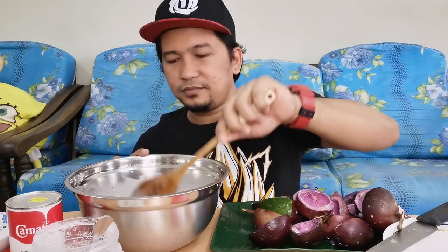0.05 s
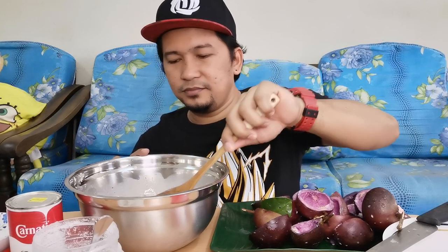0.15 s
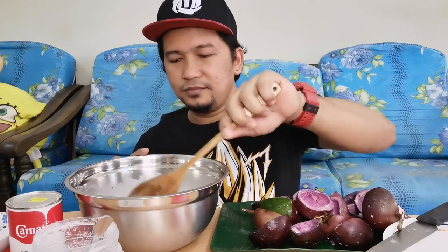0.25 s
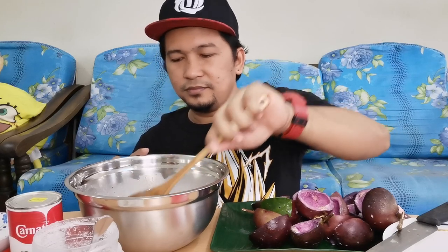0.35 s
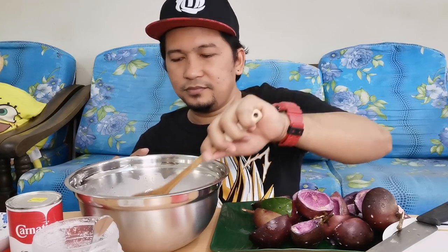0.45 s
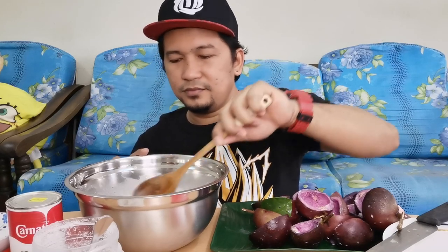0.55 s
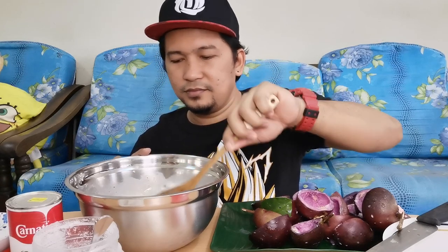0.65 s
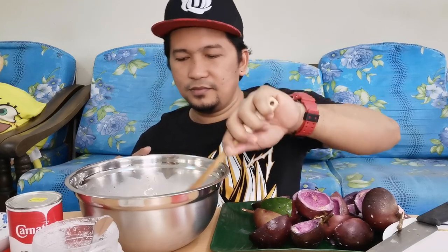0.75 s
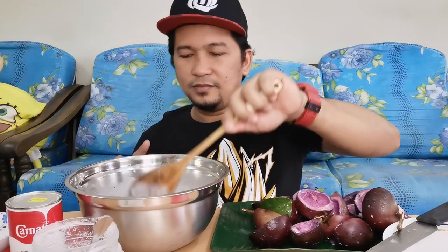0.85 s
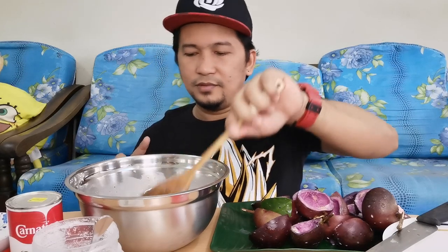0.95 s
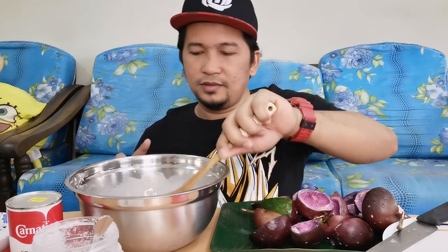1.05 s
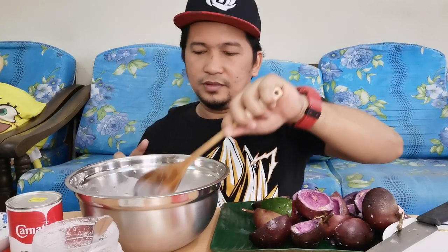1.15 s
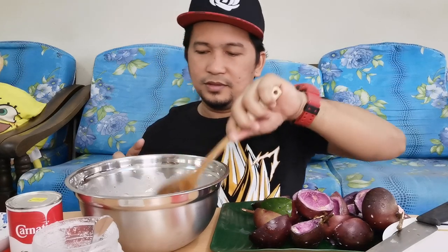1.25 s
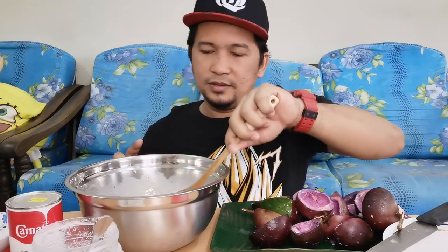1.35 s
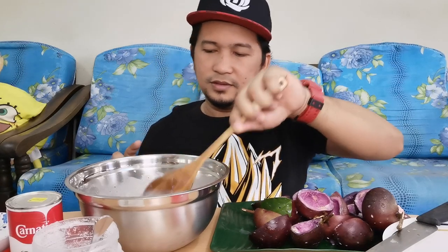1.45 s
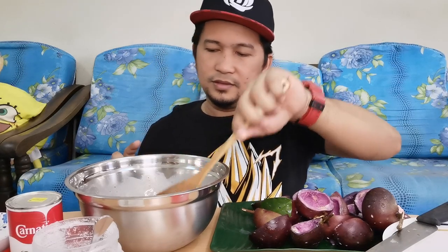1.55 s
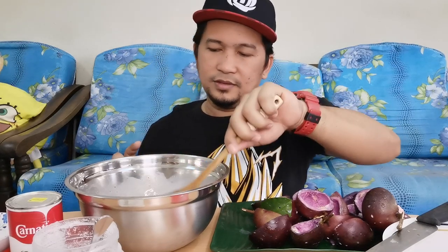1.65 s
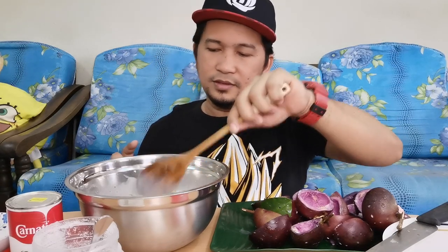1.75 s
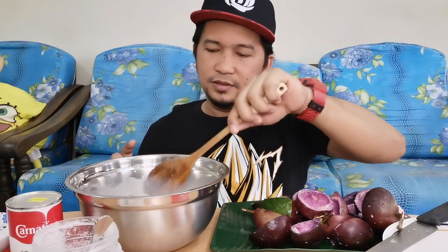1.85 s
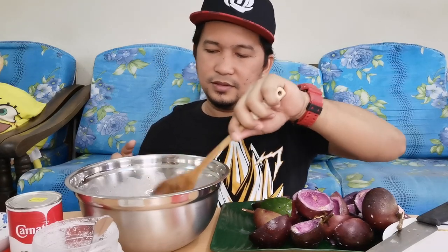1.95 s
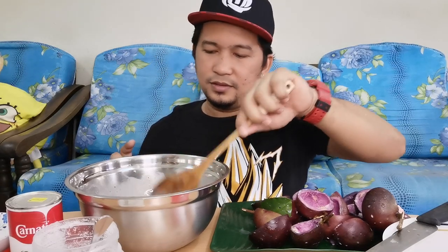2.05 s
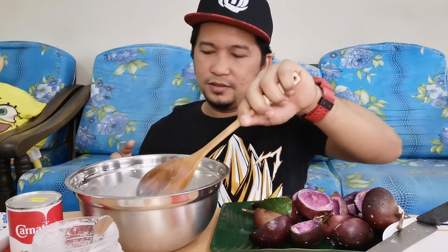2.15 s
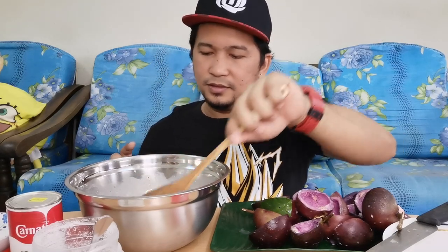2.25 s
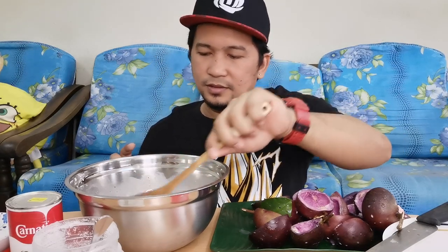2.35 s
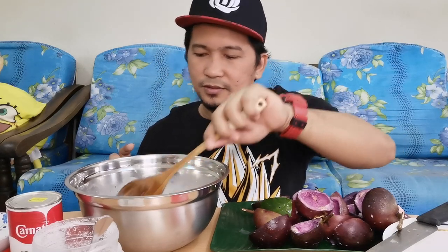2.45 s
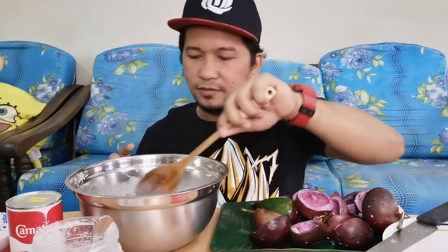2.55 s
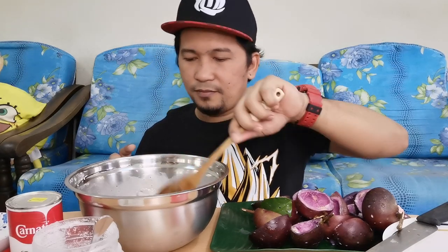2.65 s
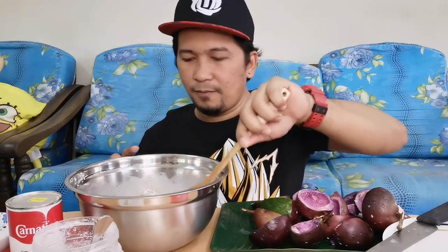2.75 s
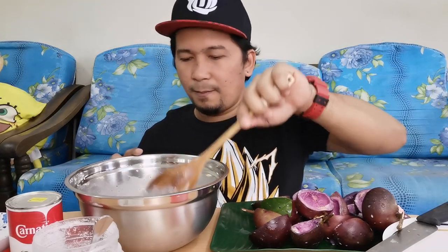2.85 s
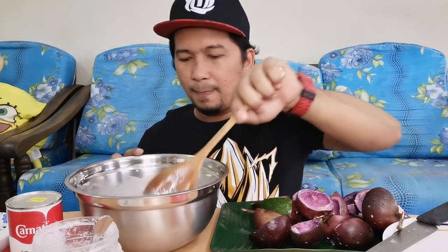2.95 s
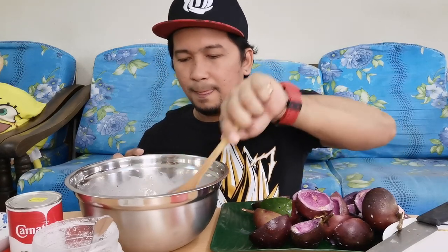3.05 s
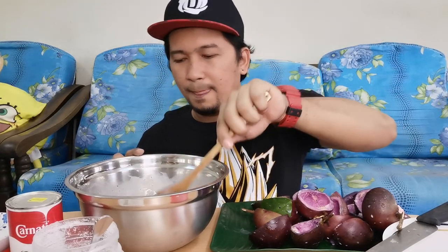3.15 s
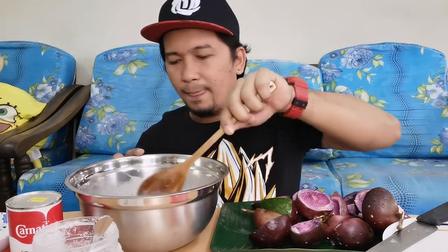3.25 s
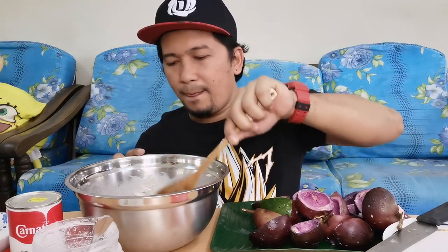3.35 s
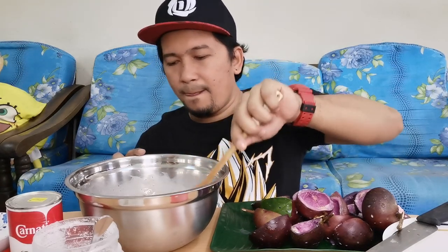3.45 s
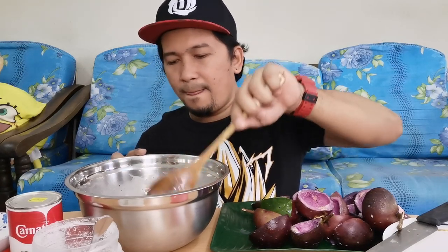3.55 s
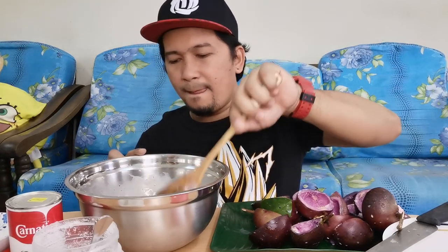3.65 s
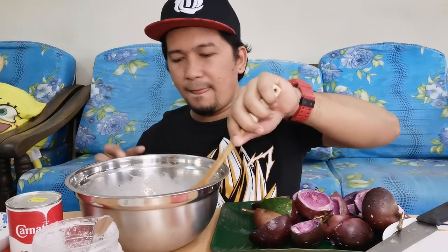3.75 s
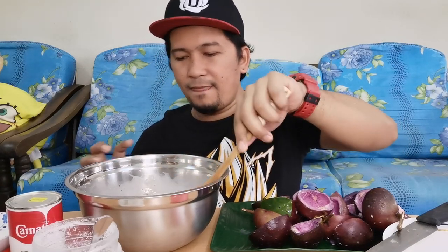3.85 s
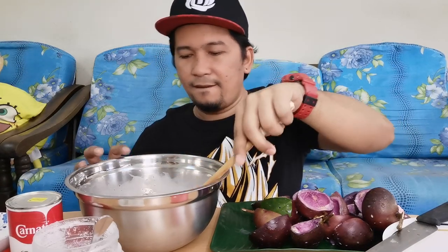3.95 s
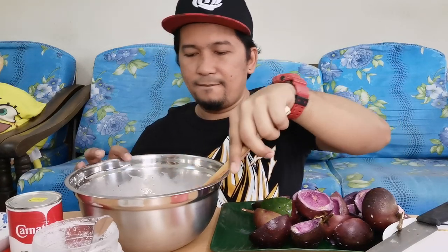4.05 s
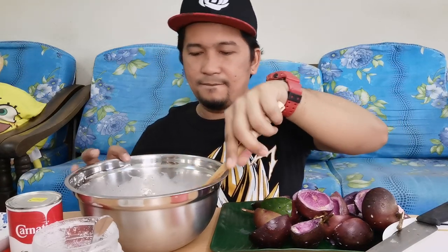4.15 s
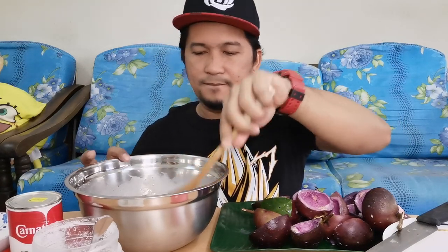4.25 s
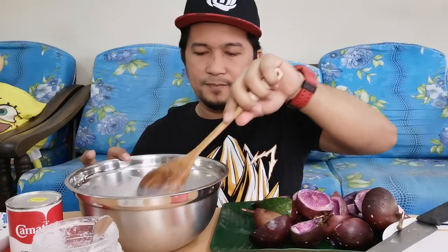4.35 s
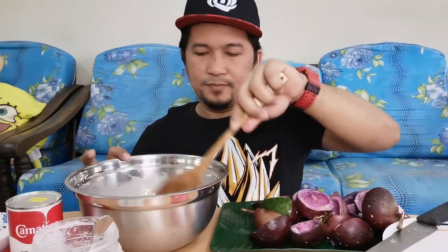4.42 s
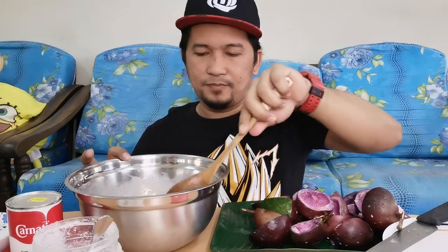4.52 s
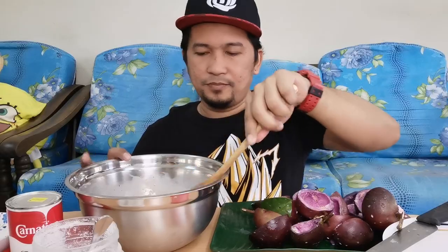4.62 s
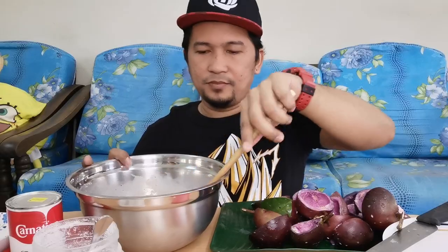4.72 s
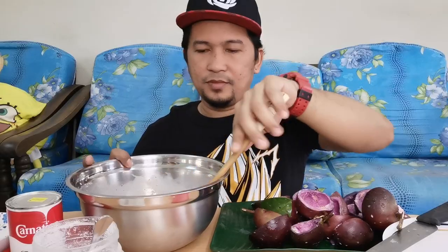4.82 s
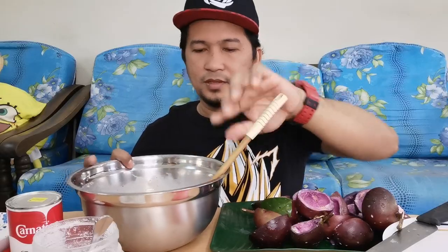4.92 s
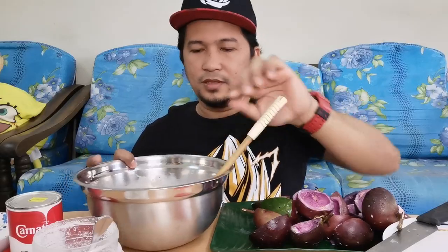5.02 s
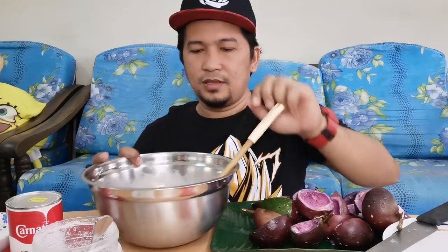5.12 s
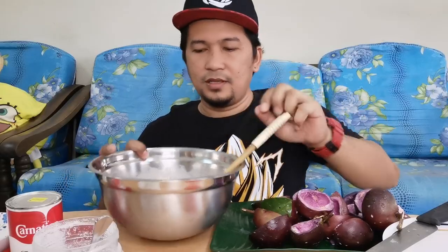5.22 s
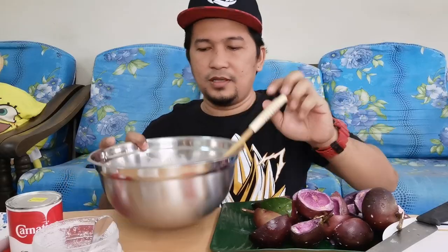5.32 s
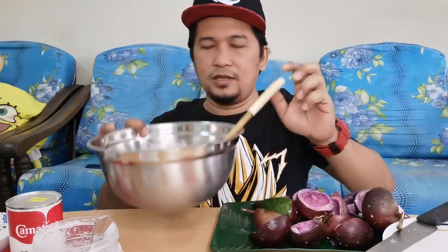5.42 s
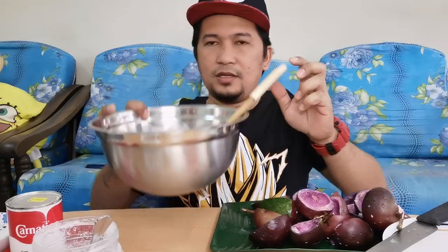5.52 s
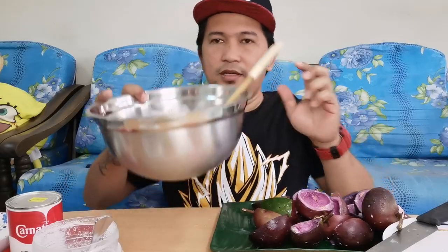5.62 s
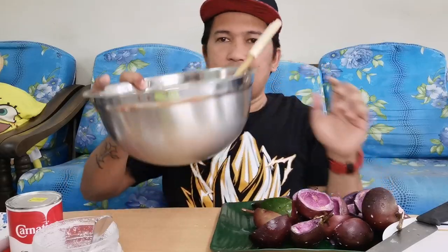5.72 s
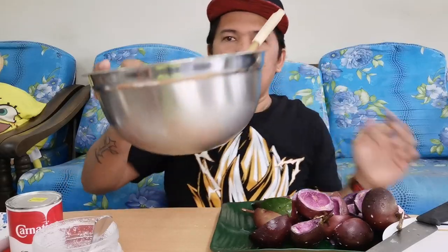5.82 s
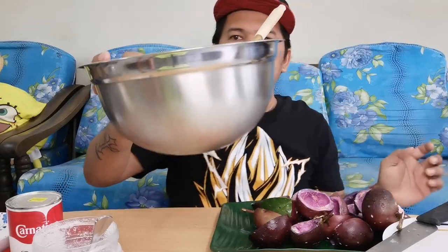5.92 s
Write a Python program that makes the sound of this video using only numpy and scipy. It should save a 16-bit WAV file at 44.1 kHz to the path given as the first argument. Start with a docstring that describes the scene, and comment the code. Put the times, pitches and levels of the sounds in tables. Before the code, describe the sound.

From the very start a wooden spoon pushes ice cubes round a steel bowl, close to the microphone in a small hard-walled room. Knocks are short, hollow and damped, mostly mid-pitched, with sharper ice clicks on top and small ticks as cubes settle. They come in uneven clusters: around 0.05-0.25 s, 0.55-0.85 s, a heavy low bump with a scraping shudder near 1.1 s, a dense run at 1.35-1.7 s, a hard crack at 2.0 s, then more at 2.4-2.8 s and 3.15-3.55 s. Around 3.8-4.05 s knocks bring a short metallic clink and a low rocking thud on the table. After a lighter gap, last strong knocks fall at 4.6-4.75 s with another rub and thud. Low handling rumble swells near 5 s and fades, with one weak dull tap at 5.3 s and an almost inaudible clink at 5.87 s over faint air and hum.

```python
"""Ice stirred in a steel bowl

Wooden spoon and ice knock and click on a bowl in a small hard-walled room: each blow is a damped resonant pulse.
Decaying sine modes sound when the bare steel rings and, with dull thuds, when the bowl bumps on the table.
Cubes tick as they settle; after the stirring stops, a low noise rumbles as the bowl is handled. Air noise and
a wavering hum lie beneath. Quiet bands are suppressed, the loudest peaks limited and the top band cut off.
"""
import sys
import numpy as np
from scipy import signal
from scipy.fft import rfft, irfft
from scipy.io import wavfile
from scipy.ndimage import uniform_filter1d, minimum_filter1d

SR = 44100
rng = np.random.default_rng(int(sys.argv[2]) if len(sys.argv) > 2 else 0)


def file_out(sig):
    """Save sig as 16-bit WAV at sys.argv[1]."""
    # one column per channel
    cols = np.atleast_2d(sig).T
    # limit, then scale
    lim = np.clip(cols, -1, 1)
    pcm = np.round(lim * 32767).astype(np.int16)
    wavfile.write(sys.argv[1], SR, pcm)


N = 263713  # length of the scene [samples]
LEAD = 256  # soft onset ahead of each blow [samples]

# Blows of spoon and ice on the wall of the bowl:
# (time [s], level [dB], pitch of the place struck [Hz], weight of ice behind the blow [dB])
KNOCKS = [(0.049, 22.5, 1490, -41.5), (0.195, 29, 1000, -11), (0.2365, 23.5, 1434, -12.5),
          (0.758, 24.5, 1138, -27.5), (0.792, 20.5, 1047, -20.5), (0.847, 20.5, 1610, -15),
          (0.857, 12.5, 850, -2.5), (1.105, -4, 1002, 0.5), (1.3576, 25, 1220, -16),
          (1.4053, 30.5, 1209, -22.5), (1.419, 17.5, 1363, -18), (1.466, 16.5, 850, 5),
          (1.53, 15.5, 1027, -25), (1.6085, 10, 1613, -27.5), (1.651, 8.5, 1700, -23.5),
          (1.6832, 19.5, 1500, -14), (1.851, 15.5, 1137, -28.5), (1.978, 34, 1315, -27),
          (2.078, 21, 1122, -4), (2.107, 15, 1006, -0.5), (2.138, 10.5, 1400, -15),
          (2.162, 17, 1100, -28.5), (2.4035, 15, 666, -5.5), (2.435, 6.5, 620, -7.5), (2.5, 12, 1682, -6),
          (2.697, 19.5, 1650, -34), (2.748, 31, 1276, -24.5), (2.817, 14.5, 963, -7.5),
          (3.1461, 12.5, 2460, -9), (3.2555, 17, 1514, -10.5), (3.264, 17, 1800, -27.5),
          (3.31, 10, 1235, -34), (3.4524, 33.5, 1336, -27.5), (3.488, 17.5, 1050, -22),
          (3.53, 24.5, 860, -22), (3.7643, 24.5, 980, -19.5), (3.793, 20.5, 1004, -9.5),
          (3.805, 14.5, 957, -14.5), (3.912, 6.5, 1005, -6.5), (4.025, 17.5, 1102, -13.5),
          (4.1, 3, 1206, -21.5), (4.265, 3.5, 952, -17), (4.6026, 18, 1310, -18.5),
          (4.719, 24.5, 1224, -28.5), (4.747, 25, 1245, -12), (5.31, 1, 716, -9)]


def gain_of(db):
    """Level and amplitude: 20 dB is a factor of ten in amplitude."""
    return 10 ** (np.asarray(db) / 20)


def unit_rms(x):
    """Normalisation: the root of the mean power becomes one."""
    return x / np.sqrt(np.mean(x ** 2) + 1e-20)


def read_curve(points, hz):
    """Interpolation of a (frequency, value) curve on a logarithmic frequency axis, as pitch is heard."""
    frequency, value = np.transpose(points)
    return np.interp(np.log(hz + 1), np.log(frequency + 1), value)


def add(mix, time, sound):
    """Superposition: sound pressures add linearly, here from a given time [s] onward."""
    part = mix[max(round(time * SR), 0):][:len(sound)]
    part += sound[:len(part)]


def minimum_phase(gain):
    """Minimum phase: the Hilbert transform of the log gain gives the promptest pulse with that gain."""
    log_gain = np.log(np.maximum(gain, gain.max() * 1e-5))
    circle = np.r_[log_gain, log_gain[-2:0:-1]]  # both halves of the spectrum
    phase = -signal.hilbert(circle).imag[:len(gain)]
    return gain * np.exp(1j * phase)


def coloured_noise(colour):
    """Filtered noise: a gain over frequency shapes a white spectrum, then the rms is set to one."""
    white = rfft(rng.standard_normal(N))
    return unit_rms(irfft(white * colour(np.fft.rfftfreq(N, 1 / SR)), N))


def background(air_db=-48.5, waver_hz=5, rumble_hz=50):
    """Stationary noise, tones phase-modulated by slow noise, and low noise under a level envelope."""
    # spectral shape of the room air: (frequency [Hz], relative density [dB])
    air_shape = [(25, -9.5), (110, -13.5), (230, -15.5), (550, -16), (1400, -21.5), (3000, -32.5),
                 (5000, -33.5), (9500, -57), (16000, -63)]
    # hum tones: (frequency [Hz], peak level [dB])
    hum_tones = [(195, -55.5), (301, -56.5), (399, -55)]
    # rumble as the bowl is handled: (time [s], rms level [dB])
    handling = [(4.2, -71.5), (4.85, -59), (4.98, -41.5), (5.65, -68.5)]
    t = np.arange(N) / SR
    air = gain_of(air_db) * coloured_noise(lambda hz: gain_of(read_curve(air_shape, hz)))
    hum = np.zeros(N)
    for hum_hz, level_db in hum_tones:
        waver = coloured_noise(lambda hz: 1 / (1 + (hz / waver_hz) ** 2))  # phase [rad]
        hum += gain_of(level_db) * np.sin(2 * np.pi * hum_hz * t + waver)
    rumble = coloured_noise(lambda hz: hz / (1 + (hz / rumble_hz) ** 4))
    return air + hum + gain_of(np.interp(t, *np.transpose(handling))) * rumble


def bowl_colour(hz):
    """Contact and body filtering [dB]: soft edges dull a blow, broad resonances and hollows colour it."""
    # soft edges of wet ice and wood: (frequency [Hz], gain [dB])
    contact_edge = [(5500, -2.5), (7800, -4.5), (9200, -11.5), (16000, -19)]
    # resonances and hollows of the filled bowl: (frequency [Hz], full width at half the dB [Hz], gain [dB])
    body = [(676, 128, 7.5), (1096, 150, 5), (1410, 123, -9.5), (1691, 165, 8.5), (5800, 340, 3.5),
            (6010, 1560, -8)]
    colour_db = read_curve(contact_edge, hz)
    for centre, width, db in body:
        colour_db = colour_db + db / (1 + (2 * (hz - centre) / width) ** 2)
    return colour_db


def contacts():
    """Mass loading damps a wall: yields blows as (time, level dB, extra room share dB, resonances)."""
    # hard edges of ice click against the steel: (time [s], level [dB], pitch [Hz])
    clicks = [(0.195, 25.5, 4920), (0.2005, 18, 2060), (0.461, -3.5, 3300), (0.5626, 17.5, 3776),
              (0.7063, 5, 3400), (0.758, 11, 2360), (0.846, -2, 5440), (1.3574, 20.5, 3350),
              (1.419, 19, 2820), (1.609, 6.5, 3520), (1.652, 14.5, 3680), (1.6826, 24, 3387),
              (1.98, 7.5, 3860), (2.4035, 14.5, 2450), (2.481, -4, 4625), (2.512, 14, 2734),
              (2.6986, 18, 2643), (2.747, 16, 2227), (2.817, 4.5, 4470), (3.1479, 7.5, 6060),
              (3.2543, 1.5, 5800), (3.4527, 20, 2490), (3.488, 6, 3370), (3.53, 11.5, 2148),
              (3.792, 11.5, 3860), (3.85, 10.5, 3670), (3.883, -2, 5890), (4.026, 6, 2680),
              (4.6014, 11.5, 2420), (4.748, 20, 2927)]
    loaded_q, q_per_db, click_q = 0.75, 0.0382, 1.435  # Q at weight 0 dB; light knocks ring more clearly
    overtone_ratio, overtone_db, overtone_per_db = 1.92, -11.5, 0.22  # light knocks hardly reach it
    low_ratio, low_q = 0.39, 0.5  # broad low resonance, excited by the weight
    rebound_s, rebound_db, rebound_per_db = 0.0098, -5, 0.38  # a heavy load lands harder again
    room_per_weight_db = 0.1  # a loaded wall radiates more into the room
    click_room_db = -1  # extra room share of a click
    for time, level_db, hz, weight_db in KNOCKS:
        q = loaded_q * np.exp(-q_per_db * weight_db)
        room_db = room_per_weight_db * weight_db
        overtone = (hz * overtone_ratio, overtone_db + overtone_per_db * weight_db, q)
        wall = [(hz, 0, q), overtone, (hz * low_ratio, weight_db, low_q)]
        yield time, level_db, room_db, wall
        yield time + rebound_s, level_db + rebound_db + rebound_per_db * weight_db, room_db, wall
    for time, level_db, hz in clicks:
        yield time, level_db, click_room_db, [(hz, 0, click_q)]


def knock(resonances, linger_s=0.0008, echo_db=-8, echo_s=0.0033, size=4096):
    """Impulse response: a contact excites damped resonances (Hz, dB, Q), dispersed and echoed in the bowl."""
    hz, t = np.fft.rfftfreq(size, 1 / SR) + 1, np.arange(size) / SR
    power = np.zeros(len(hz))
    for centre, db, q in resonances:
        detuning = q * (hz / centre - centre / hz)
        power += gain_of(db) ** 2 / (1 + detuning ** 2) ** 3
    place, path = (unit_rms(uniform_filter1d(uniform_filter1d(v, size=35), size=35))
                   for v in rng.standard_normal((2, len(hz))))
    # the place struck favours some of the higher wall modes and misses others
    pattern_db = 4 * np.tanh(place) * np.minimum(hz / 2500, 1.3)
    pulse = minimum_phase(np.sqrt(power) * gain_of(bowl_colour(hz) + pattern_db))
    # each pitch takes its own time to spread over the wall, about linger_s
    delay_s = linger_s * (1 + np.tanh(path))
    pulse *= np.exp(-2j * np.pi * np.cumsum(delay_s) * SR / size)
    # echoes swell to their strongest at echo_s / 2
    echoes = rng.standard_normal(size) * t / echo_s * np.exp(-t / echo_s * 2)
    echoes *= gain_of(echo_db) / np.linalg.norm(echoes)
    sound = np.roll(irfft(pulse * (1 + rfft(echoes))), LEAD)
    return sound * signal.windows.tukey(size, 2 * LEAD / size)


def knocks(places=3, share_db=6, share_per_db=-0.2986):
    """Direct and reverberant paths: all blows as heard directly, and as sent into the room from a few places."""
    direct, sent = np.zeros(N), np.zeros((places, N))
    for k, (time, level_db, room_db, resonances) in enumerate(contacts()):
        sound = gain_of(level_db) * knock(resonances)
        add(direct, time - LEAD / SR, sound)
        # the room share falls as the blow gets harder
        share = gain_of(share_db + share_per_db * level_db + room_db)
        add(sent[k % places], time - LEAD / SR, share * sound)
    return direct, sent


def jostle(direct, per_s=150, level_db=-12, settle_s=0.042, low_hz=900, high_hz=7000, count=12):
    """Random (Poisson-like) impacts: cubes tick together in proportion to the decaying motion after each blow."""
    keep = np.exp(-1 / (settle_s * SR))  # settle_s: time constant of the power
    motion = np.sqrt(signal.lfilter([1 - keep], [1, -keep], direct ** 2))
    out, t = np.zeros(N), np.arange(SR // 100) / SR
    for f in np.geomspace(low_hz, high_hz, count):
        struck = rng.random(N) < per_s / count / SR
        ticks = struck * rng.rayleigh(1, N) * motion
        ring = (f * t) ** 2 * np.exp(-f * t) * np.sin(2 * np.pi * f * t)
        out += signal.oaconvolve(ticks, ring)[:N]
    colour = gain_of(bowl_colour(np.fft.rfftfreq(N, 1 / SR)))
    return gain_of(level_db) * irfft(rfft(out) * colour, N)


def bumps(bump_db=-36, push_s=0.00091, thud_db=-4, thud_s=0.015, low_hz=135, high_hz=330,
          rock_hz=97, rock_t60=0.69):
    """Modal excitation: weight, sliding and rocking drive low modes of bowl and table, with thuds of ice."""
    # modes of the bowl standing on the table: (frequency [Hz], relative level [dB], t60 [s])
    table_modes = [(158.6, 5, 0.25), (175.4, -3.5, 0.33), (216.2, -1, .2), (291.6, -26, 0.11),
                   (411, -3, 0.099)]
    # the base shudders across the table: (time [s], length [s], rms level [dB])
    slides = [(1.11, .14, -38.5), (4.03, .21, -41.5), (4.76, 0.092, -36)]
    # the whole bowl rocks on its base: (time [s], starting level [dB])
    rocks = [(4.037, -33.5), (4.765, -31)]
    out, t = np.zeros(N), np.arange(SR // 2) / SR
    band = signal.butter(3, [low_hz, high_hz], "band", fs=SR, output="sos")
    ring = unit_rms(sum(gain_of(db - 60 * t / t60) * np.sin(2 * np.pi * f * t) for f, db, t60 in table_modes))
    for time, level_db, _, weight_db in KNOCKS:
        force = gain_of(level_db + weight_db + bump_db)
        shifting_ice = rng.standard_normal(len(t)) * np.exp(-t / thud_s)
        thud = unit_rms(signal.sosfilt(band, shifting_ice))
        # a gentle push builds slowly, a hard bump at once; push_s is the time at a force of one
        swell = 1 - np.exp(-t * force / push_s)
        bump = unit_rms(swell * (ring + gain_of(thud_db) * thud))
        add(out, time, force * bump / abs(ring).max())
    for time, length, level_db in slides:
        rub = signal.fftconvolve(rng.standard_normal(SR), ring, "valid")[:round(length * SR)]
        add(out, time, gain_of(level_db) * unit_rms(rub * signal.windows.tukey(len(rub), 0.3)))
    for time, level_db in rocks:
        add(out, time, gain_of(level_db - 60 * t / rock_t60) * np.sin(2 * np.pi * rock_hz * t))
    return out


def steel():
    """Modal synthesis: a cube strikes bare steel; the place favours some modes and resting ice damps them."""
    # clinks: (time [s], level [dB], pitch struck hardest [Hz], factor on the ring time [1])
    clinks = [(0.193, -38, 5800, 0.54), (3.1456, -40.5, 3870, 3.2), (3.265, -39, 1190, 0.65),
              (3.884, -23, 3230, 0.39), (4.027, -31.5, 3636, 0.25), (4.747, -29.5, 4600, 0.6),
              (5.87, -60.5, 4285, .8)]
    # modes of the steel wall: (frequency [Hz], relative level [dB], t60 before that factor [s])
    wall_modes = [(1675, -3, .35), (2230, -12, .35), (2700, -6, .28), (3335, 0, .42), (4097, -6, .34),
                  (4800, -11, .4), (5400, -14, .35), (6541, -15, .22)]
    out, t = np.zeros(N), np.arange(SR // 2) / SR
    for time, level_db, centre, hold in clinks:
        for f, db, t60 in wall_modes:
            favour = np.exp(-np.log2(f / centre) ** 2)
            envelope = favour * gain_of(level_db + db - 60 * t / (t60 * hold))
            add(out, time, envelope * rng.choice([-1, 1]) * np.sin(2 * np.pi * f * t))
    return out


def room(x, arrive_s=0.0019, size=256):
    """Diffuse reverberation: dense reflections swell within milliseconds, each band decaying at its own t60."""
    # reverberation time: (frequency [Hz], t60 [s])
    decay_times = [(100, 0.15), (700, 0.5), (2000, 0.63), (5000, 0.59), (12000, 0.45)]
    # colour of the reverberation: (frequency [Hz], gain [dB])
    room_colour = [(300, 1.5), (600, 0.5), (3000, -6.5), (6000, -2), (12000, -9.5)]
    hz, t, z = signal.stft(rng.standard_normal(SR), SR, nperseg=size)
    t60 = read_curve(decay_times, hz)[:, None]
    equal_energy = np.sqrt(2 * np.log(1000) / t60 / SR)  # long decays start lower
    z *= gain_of(read_curve(room_colour, hz)[:, None] - 60 * t / t60) * equal_energy
    tail = signal.istft(z, SR, nperseg=size)[1]
    tail *= 1 - np.exp(-(np.arange(len(tail)) / SR / arrive_s) ** 2)
    return signal.fftconvolve(x, tail)[:N]


def scene(small_room_db=-4, bump_room_db=-9):
    """Superposition of direct sounds, their reverberation and the background."""
    direct, sent = knocks()
    small, low = steel() + jostle(direct), bumps()
    reflections = sum(room(x) for x in sent)
    reflections += room(gain_of(small_room_db) * small + gain_of(bump_room_db) * low)
    return (direct + small + low + reflections + background())[None]


def suppress(x, depth_db=5, margin_db=9, size=1024):
    """Spectral noise suppression: each band is turned down whenever it sinks close to its own quiet level."""
    z = signal.stft(x, nperseg=size, noverlap=size * 3 // 4)[2]
    power = uniform_filter1d(abs(z) ** 2, size=15, axis=0)  # smoothed over frequency, then time
    power = uniform_filter1d(power, size=3, axis=1)
    quiet = np.percentile(power, 15, axis=1, keepdims=True) * gain_of(margin_db) ** 2
    z *= gain_of(-depth_db / (1 + (power / quiet) ** 4))
    return signal.istft(z, nperseg=size, noverlap=size * 3 // 4)[1][:N]


def record(dry, edge_hz=15900):
    """Dynamic and band limiting: suppression, a quick limiter to full scale, then a linear-phase low-pass."""
    x = suppress(dry[0])
    gain = minimum_filter1d(1 / np.maximum(abs(x), 1), size=200)
    limited = x * uniform_filter1d(gain, size=200)
    low_pass = signal.firwin(511, edge_hz, window=("kaiser", 9), fs=SR)
    return signal.oaconvolve(limited, low_pass, "same")[None]


dry = scene()
out = record(dry)
file_out(out)
```